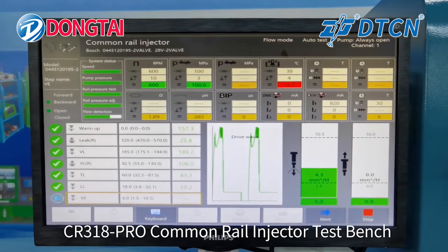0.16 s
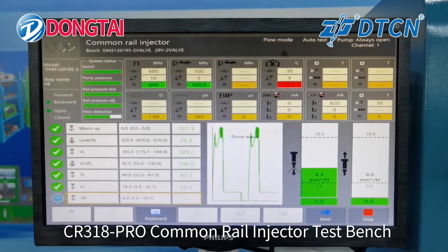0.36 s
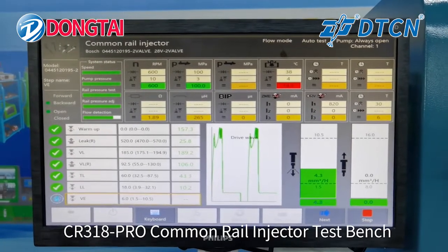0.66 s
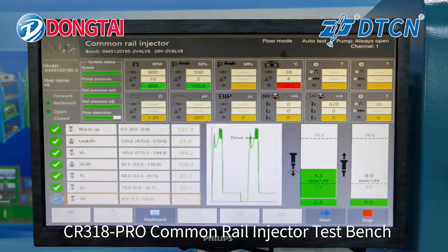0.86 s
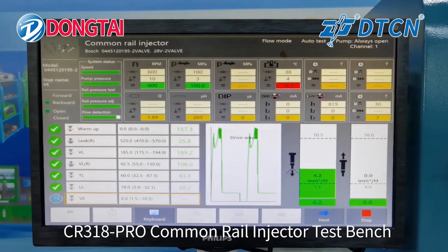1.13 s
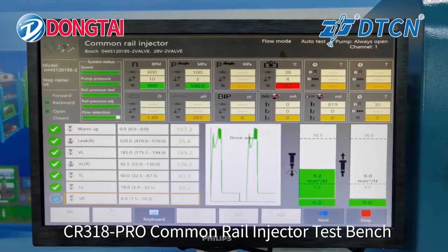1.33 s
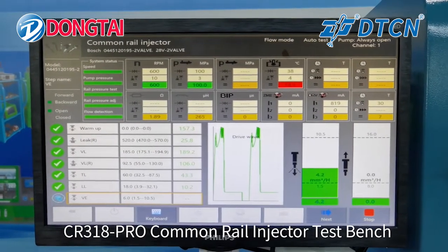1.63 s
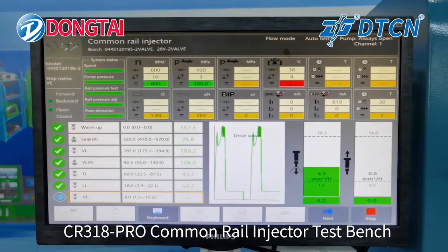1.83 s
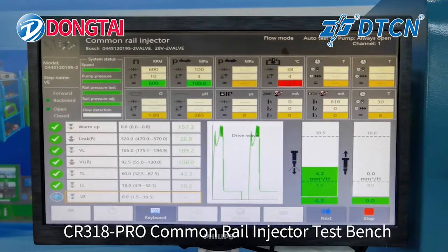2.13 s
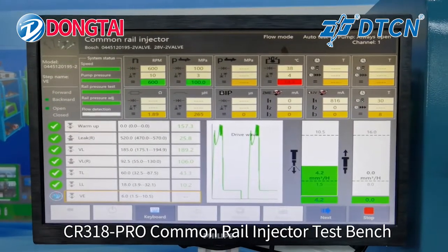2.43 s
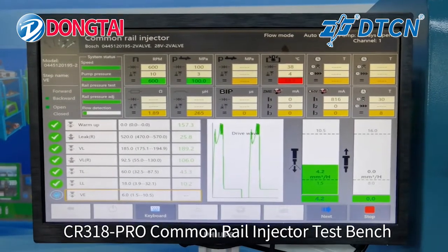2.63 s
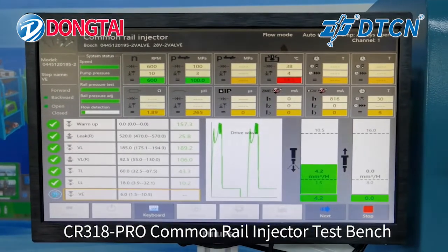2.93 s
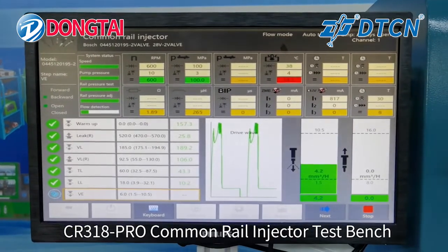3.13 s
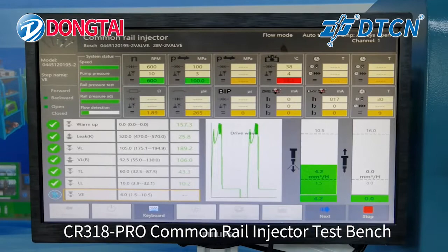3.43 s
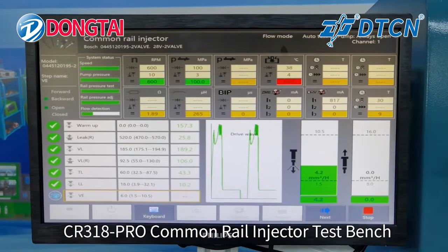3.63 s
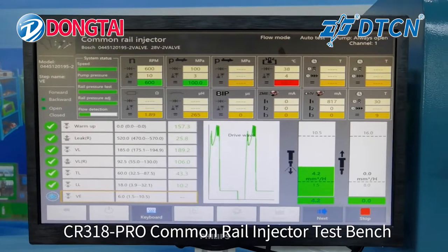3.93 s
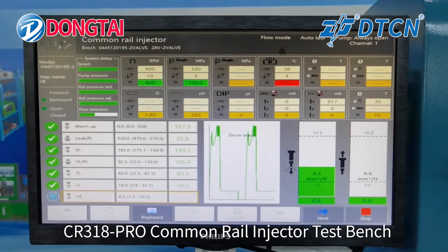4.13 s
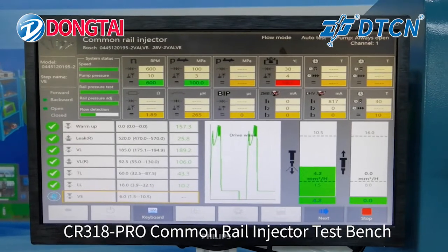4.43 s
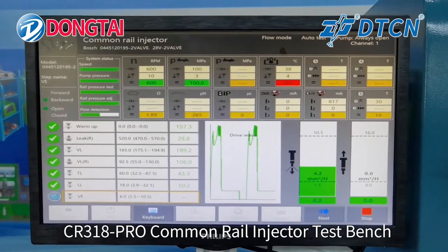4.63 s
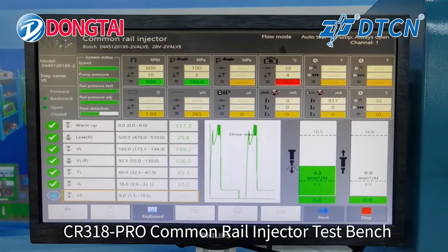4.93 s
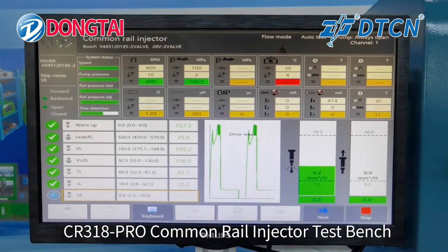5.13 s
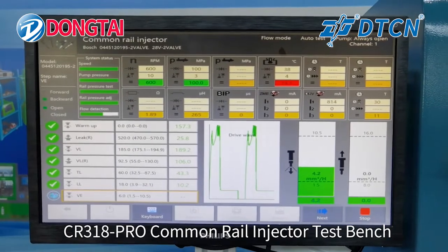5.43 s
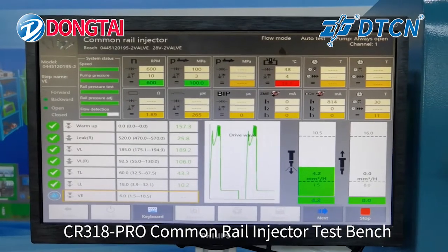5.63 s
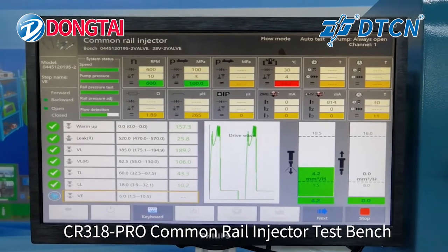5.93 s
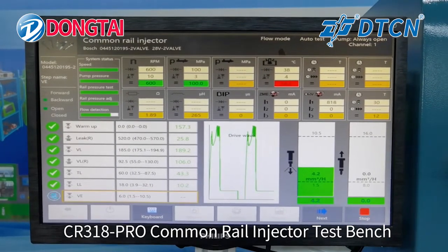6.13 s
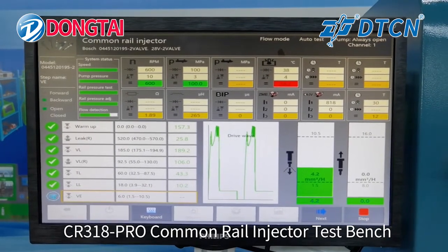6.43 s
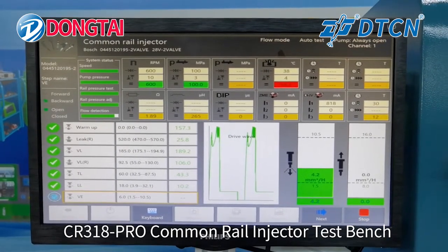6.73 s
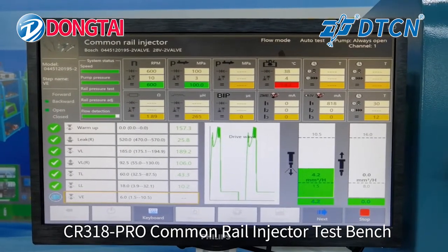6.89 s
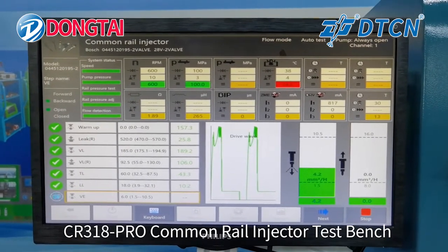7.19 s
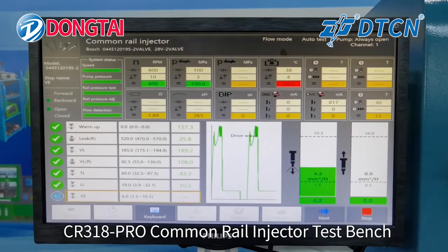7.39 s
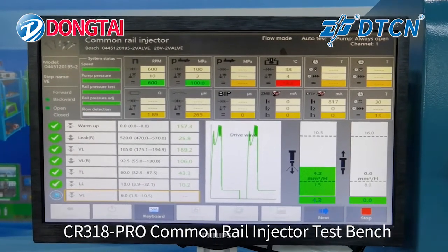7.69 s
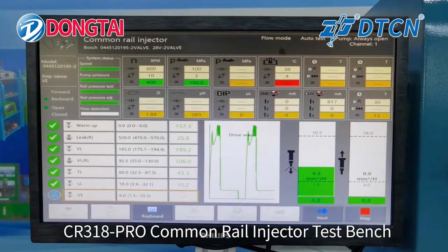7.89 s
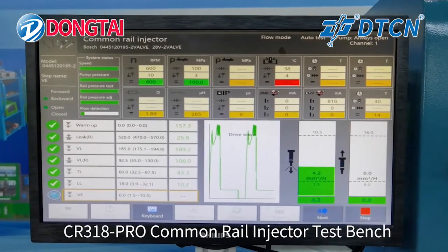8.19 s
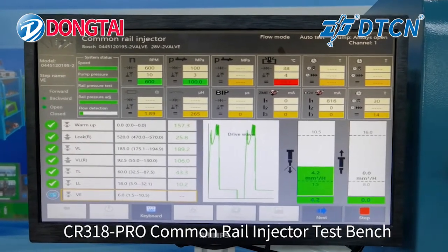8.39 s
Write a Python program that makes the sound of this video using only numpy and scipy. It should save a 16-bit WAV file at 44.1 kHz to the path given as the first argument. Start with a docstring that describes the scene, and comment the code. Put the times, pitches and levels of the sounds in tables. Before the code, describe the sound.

Steady, dense machinery noise fills the stereo picture from start to finish. Low hum and rushing fans sit underneath; a fast pump buzz rings in pipes and cabinet; a thin, piercing drive whine throbs quickly above, mixed with bright hiss. Pitch and speed stay constant. Only small drifts in individual tones and left-right balance occur, as from a hand-held microphone moving slightly in a reflective room.

```python
"""A fuel-injector pump pulses about 70 times a second, exciting a tall harmonic series in pipes and cabinet.
The motor drive whines in sidebands around its 8 kHz switching tone; motor and frame add discrete hum tones.
Filtered noise gives the low rumble of fans and oil flow, and a broadband hiss above 1.5 kHz. A hand-held stereo
microphone, left port further away, sways slowly through the room's standing waves, so tones drift slowly, high
ones most. A fast random roughness blurs each tone. All sources run throughout."""
import sys
import numpy as np
from scipy import signal
from scipy.fft import rfft, irfft, next_fast_len
from scipy.io import wavfile
from scipy.ndimage import uniform_filter1d, map_coordinates

SR = 44100
rng = np.random.default_rng(int(sys.argv[2]) if len(sys.argv) > 2 else 0)


def master_out(mix):
    """Clip the mix to full scale and print it as 16-bit PCM to the path in sys.argv[1]."""
    frames = np.transpose(np.atleast_2d(mix))
    ceiling = np.clip(frames, -1, 1)
    pcm = np.round(ceiling * 32767).astype(np.int16)
    wavfile.write(sys.argv[1], SR, pcm)


N = 377055
TIME = np.arange(N) / SR  # s
PUMP_HZ = 69.9618  # pump strokes per second
SWITCH_HZ, DRIVE_HZ = 7999.93, 9.581  # carrier and sideband spacing of the motor drive
LAG_S = 16 / 44100  # lag of the left port
TOP_HZ = 15760  # upper band limit


def amp(db):
    """Level definition: amplitude ratio is 10 to the power of level/20."""
    return 10 ** (np.asarray(db) / 20)


def wander(rate, at_s, shape=()):
    """Equal-power interpolation: random knots, rate per second, joined into smooth curves of rms 1."""
    knots = rng.standard_normal((*shape, int(N * rate / SR) + 3))
    place = at_s * rate
    k = place.astype(int)
    turn = (place - k) * np.pi / 2
    return knots[..., k] * np.cos(turn) + knots[..., k + 1] * np.sin(turn)


def humps(table, hz):
    """Spectral weighting: summed bell-shaped level changes (f/Hz, width/Hz, level/dB) as a gain."""
    level_db = sum(db / (1 + (2 * (hz - centre) / width) ** 2) for centre, width, db in table)
    return amp(level_db)[:, None]


def ports(rows, hz, start, at_s, sway, roughness):
    """Superposition of mid and side phasors gives each tone at both ports: (2, tones, times)."""
    mid_db, side_db, pan_db, rise_db = np.transpose(rows)
    mid, side = amp(mid_db), amp(side_db)
    # the side part in step with the mid tips the balance; the rest is the lag of the left port
    balance = np.tanh(pan_db * np.log(10) / 20)
    in_step = np.clip(balance * (mid ** 2 + side ** 2) / (2 * mid * side), -1, 1)
    lag_sign = np.sign(np.sin(2 * np.pi * hz * LAG_S))
    side = side * (in_step - 1j * lag_sign * np.sqrt(1 - in_step ** 2))
    # start is the phase at the nearer, right port; sqrt(2) turns rms into peak
    phase = np.exp(1j * (start - np.angle(mid - side)))
    size = np.sqrt(2) * phase * np.array([mid, side])
    rise = amp(rise_db[:, None] * (at_s / TIME[-1] - .5))

    # high tones waver most: slow drift, plus a fast random roughness that blurs each line
    height = (np.minimum(hz, 9000) / 9000)[:, None]
    shape = (2, len(hz))
    slow = sway * height * (wander(1.246, at_s, shape) + 1j * wander(1.16, at_s, shape))
    fast = roughness * height ** 0.51 * (wander(25, at_s, shape) + 1j * wander(25, at_s, shape))
    # this roughness is common to mid and side
    common = wander(16, at_s, shape[1:]) + 1j * wander(16, at_s, shape[1:])
    both = 0.86 * roughness * height ** 0.56 * common
    shake = 1 + slow + 0.81 * fast + both
    shake_rms = np.sqrt(np.mean(abs(shake) ** 2, axis=2, keepdims=True))
    mid, side = size[..., None] * rise * shake / shake_rms
    return np.array([mid + side, mid - side])


def cycle(rows, steps, start, base_hz, step_hz, sway, roughness, unsteady_s, size=4096, count=400):
    """Fourier synthesis: equally spaced tones form one slowly changing cycle, played round and round."""
    at_s = np.linspace(0, TIME[-1], count)
    lines = np.zeros((2, count, size), complex)
    tones = ports(rows, base_hz + steps * step_hz, start, at_s, sway, roughness)
    lines[:, :, steps] = tones.transpose(0, 2, 1)
    shapes = np.fft.ifft(lines) * size
    shapes = np.concatenate([shapes, shapes[..., :1]], axis=2)  # closes the cycle
    turns = step_hz * (TIME + unsteady_s * wander(2.56, TIME))  # the shaft runs a little early or late
    where = [TIME / TIME[-1] * (count - 1), turns % 1 * size]
    played = np.array([map_coordinates(s, where, order=1) for s in shapes])
    return (played * np.exp(2j * np.pi * base_hz * TIME)).real


# spread of the faint tones, before clipping: (mid level/dB, side level/dB, L-R/dB, rise/dB)
SCATTER_DB = (4.34, 4.9, 6, 5)


def stack(steps, mid_db, side_db, loud_steps, loud):
    """Random scatter: faint tones spread round their usual level, loud ones take their own row."""
    usual = np.transpose(np.broadcast_arrays(mid_db, side_db, 0 * steps, 0 * steps))
    rows = usual + SCATTER_DB * np.clip(rng.standard_normal(usual.shape), -2, 2)
    rows[np.searchsorted(steps, loud_steps)] = loud
    return rows


# the knock in each pump stroke: (f/Hz, direct share against echoes 0-1, arrival t/ms)
KNOCK = [(139, 0.55, 4), (456, 0.72, 4), (1110, 0.74, 3.5), (1586, 0.33, 2), (2606, 0.21, 1.5),
         (3980, 0.31, 1), (6480, 0.47, 0.73), (7510, 0.4, 0), (8400, 0.42, 0), (8980, 1, 0),
         (12100, 0.75, 1), (15700, .7, 0)]
# usual level of the other overtones, before dips and scatter: (f/Hz, mid level/dB, side level/dB)
PUMP_FAINT = [(300, -61.5, -65), (1500, -66, -60.5), (2430, -63, -59), (3140, -51, -47), (3680, -57, -51),
              (4250, -62, -54), (5850, -54, -50), (6570, -56, -55), (7600, -49, -45), (8800, -59, -49),
              (10000, -50.5, -49), (10500, -57, -55), (12000, -53, -60), (12600, -70, -67),
              (14000, -66, -62), (15700, -66, -70)]
# multiples of PUMP_HZ that ring out
PUMP_LOUD_STEPS = [2, 3, 4, 5, 6, 8, 10, 11, 12, 13, 14, 15, 16, 17, 18, 20, 21, 22, 27, 29, 36, 38, 39, 44,
                   45, 46, 47, 48, 49, 50, 51, 52, 53, 56, 59, 67, 74, 75, 76, 77, 78, 80, 81, 82, 91, 92,
                   93, 94, 95, 101, 102, 103, 104, 105, 106, 109, 110, 112, 113, 114, 115, 116, 117, 118,
                   119, 120, 121, 122, 123, 124, 125, 126, 128, 137, 138, 144, 148, 157, 167, 170, 173]
# one row for each of them: (mid level/dB, side level/dB, L-R/dB, rise from start to end/dB)
PUMP_LOUD = [(-37, -58.5, -1.1, 0), (-28, -46.3, -1.1, 0.9), (-36, -51, 0.5, -0.5),
             (-37.1, -49.5, -1.2, 0.5), (-45.5, -59, 2, -1.5), (-50, -71, 2.5, 1), (-51, -58, -5, -1.5),
             (-47.5, -63, -7, -1.6), (-42.5, -44.5, -2.5, -0.2), (-57, -61, -2, 0.2), (-52.5, -60, -4, 0.8),
             (-58, -60.5, 15.3, -6), (-57, -64, -5, 1), (-59, -70, -9, 3), (-49.9, -46, 2.1, 0.4),
             (-44.5, -45.5, -3.5, -3.0), (-68, -49, 0.5, 3), (-62.5, -42, 1, -3), (-55.5, -46.5, -4.5, -5),
             (-77, -50, -5, 3), (-44.5, -46.5, 8, 1), (-41.9, -58, -2, -1), (-46, -59.6, -2.2, -0.5),
             (-38, -41.5, 0, -1), (-50, -51, -6, 6), (-46.5, -41, -10.5, -1), (-45, -43.0, 6, 7),
             (-52, -54, -9, 3), (-40.5, -34.5, -6, 0.5), (-46.5, -38, 5, -3.4), (-55, -43, -1.6, 6.0),
             (-41, -51, -1.2, -0.0), (-46.5, -56, 3.9, -3), (-44.5, -47, 13.0, -1), (-48, -37, 0.5, 1),
             (-49, -38, -2.5, -3), (-38, -51, -4, -1), (-43.5, -46, 0, -4), (-44, -49.8, 0.1, -7),
             (-46.0, -59.9, 1.2, -10), (-48, -60.1, 0, 16), (-41.5, -48.2, -9, 6), (-42.5, -51, -8, 2),
             (-37, -37.5, 0, -7.8), (-49, -43, 5, -3.1), (-41, -42, 2.1, -2.4), (-39.5, -39, -2, 1),
             (-35.0, -39, -8, 4.5), (-45, -46, -11.0, 10), (-45, -54.7, -1.0, -4.8), (-51, -44, 0, -3),
             (-51, -47.3, -7.8, -3.3), (-39, -41, -7.6, -5), (-37.5, -40, -9.4, 9), (-57, -40.4, -5.0, 9.9),
             (-38, -43, -2.6, 0), (-46, -43.2, -7, -5.5), (-40, -45.2, -11.1, 6.2), (-42, -47.5, -8.9, 3),
             (-43, -50, -7, -4), (-36, -37.8, -7, 2.6), (-40, -40.2, -3.9, 4.5), (-47, -42, -6, 8),
             (-44.5, -35, -4, 7.0), (-46, -35.0, -4, 8), (-44, -35, -1, 2.6), (-52.3, -34.2, 6, 0),
             (-39, -41.8, -2.2, -4), (-41, -41, -2.3, -10.0), (-42, -38.7, 3, 6.7), (-39, -36.1, 3, 3),
             (-57, -38.3, 5, -3.2), (-44, -46, 1, 0), (-42.5, -57.3, -0.0, -0.9), (-45.5, -51.9, 3.7, -9.8),
             (-43.5, -43, -4, -2), (-45.5, -45, -1, 9), (-45.5, -46.6, 0.2, 1.1), (-50.5, -53, 2, -9),
             (-48, -50.6, -2.6, 0), (-48, -46, 2, 3)]
# narrow bands where the mid is weaker, in faint pump overtones and noise: (f/Hz, width/Hz, level/dB)
MID_DIPS = [(610, 43, -4), (1120, 45, -3), (1380, 40, -3), (1770, 76, -8), (2250, 130, -5), (2860, 66, -10),
            (4460, 130, -16), (6900, 150, -6), (7800, 80, -5), (10700, 80, -4), (12760, 100, -8)]


def pump(ring_s=0.0153):
    """Periodic excitation: a knock, 60 dB down after ring_s, and its echoes ring every overtone."""
    steps = np.arange(2, int(TOP_HZ / PUMP_HZ))
    hz = steps * PUMP_HZ
    t = np.linspace(0, 1 / PUMP_HZ, 1024, endpoint=False)
    knock = rfft(rng.standard_normal(len(t)) * amp(-60 * t / ring_s))[steps]
    echoes = rfft(rng.standard_normal(len(t)))[steps]
    at, share, arrival_ms = np.transpose(KNOCK)
    share = np.clip(np.interp(hz, at, share), 0, 1)
    # group delay summed over frequency is phase
    late = 2 * np.pi * PUMP_HZ * np.cumsum(np.interp(hz, at, arrival_ms)) / 1000
    start = np.angle(share * knock / abs(knock) + (1 - share) * echoes / abs(echoes)) - late

    at, mid_db, side_db = np.transpose(PUMP_FAINT)
    mid_db = np.interp(hz, at, mid_db) + 20 * np.log10(humps(MID_DIPS, hz)[:, 0])
    side_db = np.interp(hz, at, side_db)
    rows = stack(steps, mid_db, side_db, PUMP_LOUD_STEPS, PUMP_LOUD)
    return cycle(rows, steps, start, 0, PUMP_HZ, sway=0.19, roughness=0.25, unsteady_s=6e-6)


# gain on whine and hiss: (t/s, level/dB)
TREBLE_LEVEL = [(0.0, 1), (8.55, 1)]


def treble_gain():
    """Level interpolation: the gain in dB is linear between the table's times."""
    return amp(np.interp(TIME, *np.transpose(TREBLE_LEVEL)))


# loud lines of the whine, whole steps of DRIVE_HZ away from SWITCH_HZ; step 19 sits almost on the pump's 117th
# overtone and merges with it
WHINE_STEPS = [-18, -16, -15, -14, -12, -11, -9, -6, -5, -3, -1, 1, 3, 6, 7, 9, 15, 18, 19, 36]
# one row for each, before treble gain: (mid level/dB, side level/dB, L-R/dB, rise from start to end/dB)
WHINE = [(-58, -36.8, 0, -4.9), (-50, -51, -2, -1), (-47, -52.1, 0.4, 0.6), (-51, -48.5, -7.9, 0),
         (-45.5, -41, 10.5, 3), (-53, -47.0, -4, 6), (-54, -43, 7, 5), (-38, -53, -3.8, 2.4),
         (-38.5, -49, 7, 7), (-33, -38.6, -4.6, 0), (-43, -46, 2, 7), (-40.5, -45, -5, 7),
         (-34, -34.5, -0.9, 5), (-46, -42, 4, 2.2), (-48, -43, 15, 2.4), (-48, -47.6, -4.7, 3),
         (-47, -53, 12.5, 4.3), (-43.5, -45, 16, 4), (-49, -43, -4, 0), (-50, -47.2, 8, 3)]
# usual level of the sidebands between them, before scatter and treble gain: (mid level/dB, side level/dB)
WHINE_FAINT_DB = (-64.5, -58)


def drive():
    """Modulation: slow motor current splits the carrier into sidebands nearly in step, so it throbs."""
    steps = np.arange(WHINE_STEPS[0], WHINE_STEPS[-1] + 1)
    start = .3 * rng.standard_normal(len(steps))  # rad
    rows = stack(steps, *WHINE_FAINT_DB, WHINE_STEPS, WHINE)
    whine = cycle(rows, steps, start, SWITCH_HZ, DRIVE_HZ, sway=0.24, roughness=0.3, unsteady_s=3e-5, size=2048)
    return treble_gain() * whine


# frame and motor tones: (f/Hz, mid level/dB, side level/dB, L-R/dB, rise from start to end/dB)
HUM = [(86.5, -54.5, -62, -7, 0.8), (104.7, -38.5, -61, -1.5, 0.2), (136.8, -47, -64.6, -4, 0),
       (144.5, -45.5, -68.3, 0, 6), (163.2, -40, -61, 0.8, 2), (175.8, -48.5, -70, 2, 10),
       (180.7, -49.5, -64.4, 2, 8), (213.3, -51.5, -73, -1.3, 15), (282.6, -52, -74, -3, -4),
       (1001, -51.5, -51, 6, 1), (1976, -62, -58, 5, -5)]


def hum():
    """Additive synthesis: motor and frame sound as separate tones, mostly low."""
    hz, *levels = np.transpose(HUM)
    start = 2 * np.pi * rng.random(len(hz))
    size = ports(np.transpose(levels), hz, start, TIME, sway=3.1, roughness=0.34)
    return (size * np.exp(2j * np.pi * hz[:, None] * TIME)).real.sum(axis=1)


# narrow bands where the noise is stronger: (f/Hz, width/Hz, level/dB)
NOISE_PEAKS = [(223.7, 6.3, 16), (319, 16, 3.5), (399, 8.6, 4), (443, 8.2, 8.5), (7950, 200, 7),
               (8680, 290, 8)]
# part of the side noise that is the mid turned by a quarter cycle: (f/Hz, share 0-1)
SHARED = [(80, 0), (200, .55), (500, .2), (800, .5), (1250, .55), (1700, 0)]


def coloured_noise(spectrum, patchy_db):
    """Spectral shaping: white noise takes a mid and a side spectrum, narrow peaks and faint patches."""
    hz, _, (a, b) = signal.stft(rng.standard_normal((2, N)), SR, nperseg=8192)
    f, mid_db, side_db = np.transpose(spectrum)

    def read(at, values):
        """Logarithmic frequency scale: values are interpolated along log f."""
        return np.interp(np.log(hz + 1), np.log(at), values)[:, None]

    inside = ((hz >= f[0]) & (hz < f[-1]))[:, None]
    field = uniform_filter1d(rng.standard_normal(a.shape), 40, 0)  # smooth over frequency
    field = uniform_filter1d(field, 2, 1)  # smooth over time
    # sqrt(SR / 2) makes white noise unit power per Hz
    gain = inside * np.sqrt(SR / 2) * amp(patchy_db * field / field.std())
    gain = gain * humps(NOISE_PEAKS, hz)
    shared = np.clip(read(*np.transpose(SHARED)), 0, 1)
    mid = gain * humps(MID_DIPS, hz) * amp(read(f, mid_db)) * a
    side = gain * amp(read(f, side_db)) * (np.sqrt(1 - shared ** 2) * b - 1j * shared * a)
    return signal.istft(np.array([mid + side, mid - side]), SR, nperseg=8192)[1][:, :N]


# fans and oil flow, before peaks, dips and balance: (f/Hz, mid level/dB per Hz, side level/dB per Hz)
RUMBLE = [(25, -81, -93), (60, -83, -86), (91, -63, -78), (150, -59, -81), (180, -58, -76),
          (200, -58.5, -76), (232, -64, -76), (280, -65, -75), (364, -69, -80), (425, -67.5, -81),
          (480, -77, -86), (690, -78, -83), (1000, -76.5, -84), (1505, -77.5, -74)]


def rumble():
    """Broadband flow noise: fans and oil flow rush below 1.5 kHz, slightly louder at the right port."""
    return coloured_noise(RUMBLE, patchy_db=1.5) * amp([[-.5], [.6]])


# broadband hiss above 1.5 kHz, before all later gains: (f/Hz, mid level/dB per Hz, side level/dB per Hz)
HISS = [(1503, -81.5, -78), (1790, -80.5, -85), (2500, -74.5, -85), (3200, -69, -78), (4500, -74, -84),
        (5380, -71.5, -67.5), (6670, -67.5, -70), (7000, -72.5, -76), (8200, -69, -69), (8800, -69, -66),
        (9300, -71.5, -72), (12500, -76, -74), (13100, -82, -82), (15800, -81, -85)]


def hiss():
    """Amplitude modulation: broadband hiss above 1.5 kHz swells very slightly at each pump stroke."""
    pulse = amp(0.31 * np.cos(2 * np.pi * (PUMP_HZ * TIME - .1)))
    return treble_gain() * pulse * coloured_noise(HISS, patchy_db=2.05) * amp([[-.4], [.4]])


def scene():
    """Superposition: the sound pressures of all sources add."""
    return pump() + drive() + hum() + rumble() + hiss()


def record(dry):
    """Ideal low-pass filtering: the recorder keeps nothing above its band limit."""
    m = next_fast_len(N + SR // 2)
    passed = np.fft.rfftfreq(m, 1 / SR) < TOP_HZ
    return irfft(rfft(dry, m) * passed, m)[:, :N]


dry = scene()
out = record(dry)
master_out(out)
```